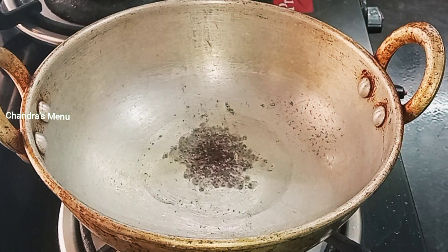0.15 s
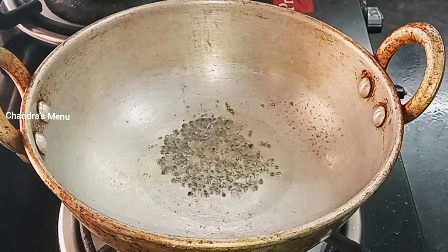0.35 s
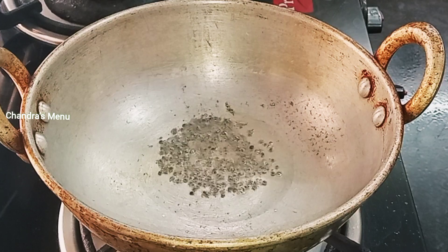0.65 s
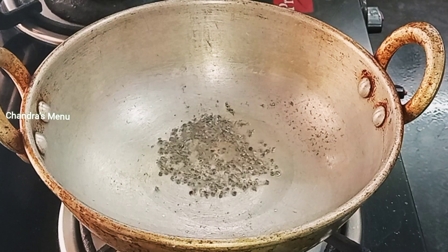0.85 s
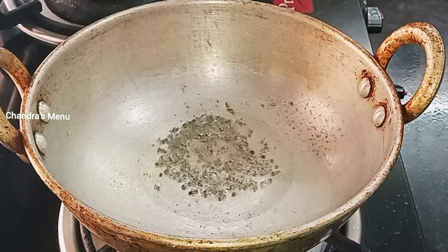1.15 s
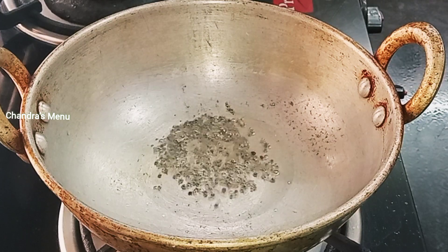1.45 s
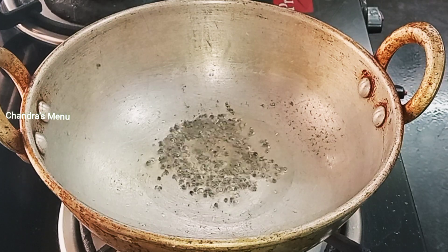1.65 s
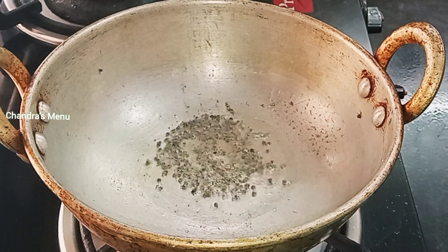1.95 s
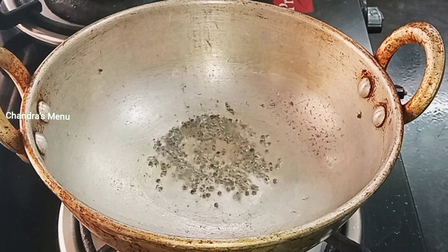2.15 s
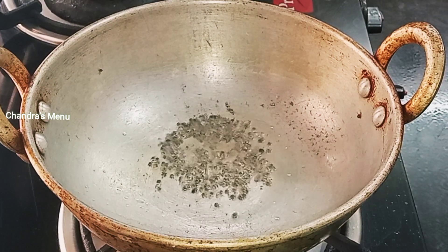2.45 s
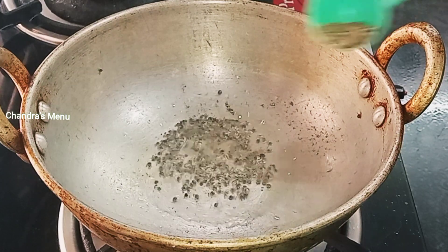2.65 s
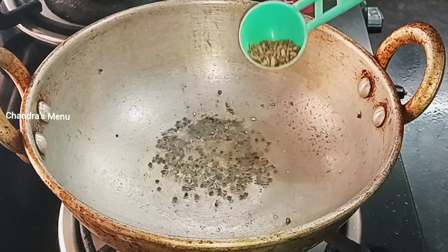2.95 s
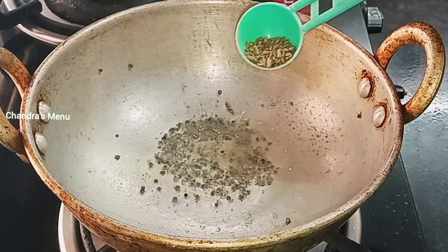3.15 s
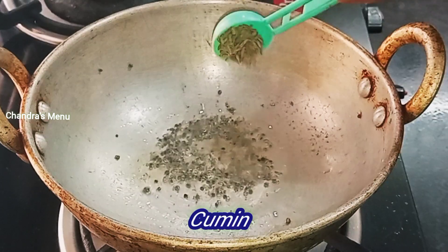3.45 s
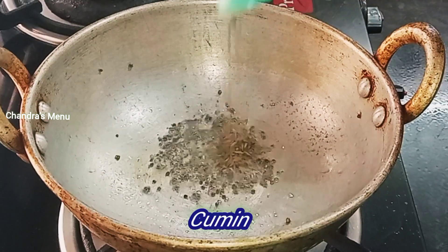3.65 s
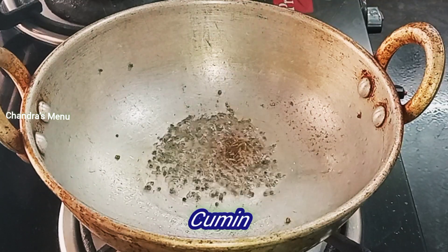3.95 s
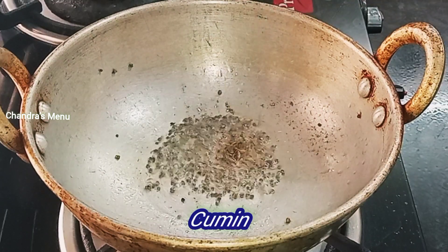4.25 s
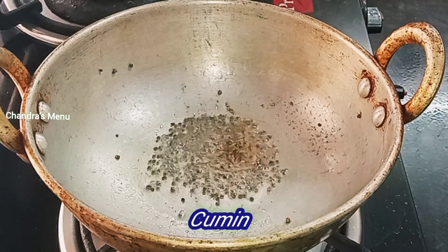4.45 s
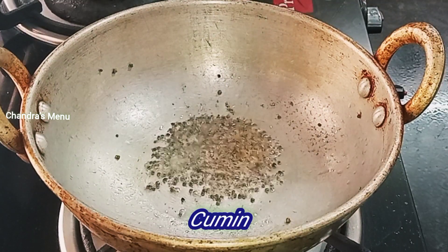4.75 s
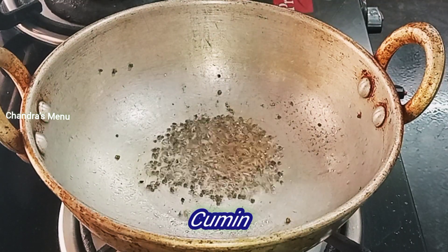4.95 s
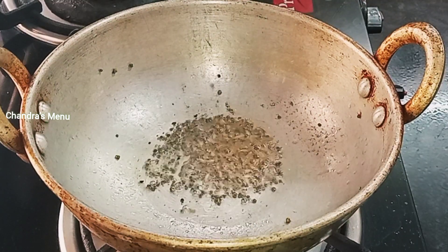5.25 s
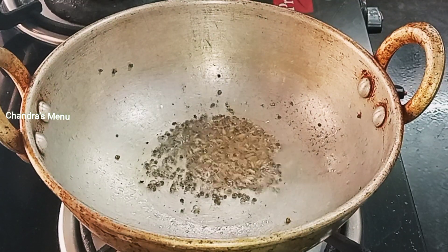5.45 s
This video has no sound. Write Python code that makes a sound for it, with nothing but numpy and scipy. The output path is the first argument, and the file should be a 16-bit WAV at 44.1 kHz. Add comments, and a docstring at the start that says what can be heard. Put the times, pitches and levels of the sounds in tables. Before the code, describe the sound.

Seeds temper in hot oil: one soft utensil knock, a few weak ticks, then louder crisp bursts that crowd together until the end without a pause. Each has a brief hissing tail and slight metallic pan ring. A fine oil fizz rises late. Close microphone, short hard-walled room echo, mono, occasional blunt drop hits and faint bumps.

```python
"""Mustard and cumin seeds burst in hot oil in a steel pan, heard from close above in a small kitchen.
First a utensil is set down: noise through its resonances, with duller knocks like it throughout.
Single bursts follow and soon crowd together: noise cracks with hissing tails from steam, pan and walls.
Flying drops thump the microphone as short pushes. A fizz of tiny clicks lies between and grows near the end;
below, a low hum of narrow noise wavers and mostly sinks away."""
import sys
import numpy as np
from scipy import signal
from scipy.fft import rfft, irfft
from scipy.io import wavfile
from scipy.ndimage import uniform_filter1d

SR = 44100
rng = np.random.default_rng(int(sys.argv[2]) if len(sys.argv) > 2 else 0)


def to_wav(sig):
    """Store sig (one row per channel, or 1-D mono) as 16-bit WAV at the path in sys.argv[1].

    Samples outside -1..1 are clipped; the rate is SR.
    """
    pcm = np.clip(np.atleast_2d(sig), -1, 1) * 32767
    pcm = np.round(pcm).astype(np.int16)
    wavfile.write(sys.argv[1], SR, pcm.T)  # frames by channels


def linear_from_db(decibels):
    """Turn decibels (scalar or array-like) into linear amplitude factors; 0 gives 1."""
    return 10 ** (np.asarray(decibels, float) / 20)


N = 246519   # length in samples


def rms_one(x):
    """Scales a sound to an average strength (rms) of 1."""
    return x / np.sqrt(np.mean(x ** 2) + 1e-20)


def colour(x, spectrum, size=4096):
    """Filters by a spectrum without sounding early: the folded cepstrum makes it minimum phase."""
    hz, db = np.transpose(spectrum)
    grid = np.maximum(np.arange(size // 2 + 1) * SR / size, 1)
    curve_db = np.interp(np.log(grid), np.log(hz), db)
    cepstrum = irfft(np.log(linear_from_db(curve_db)))
    cepstrum[1:size // 2] *= 2
    cepstrum[size // 2 + 1:] = 0
    response = irfft(np.exp(rfft(cepstrum)))
    return signal.fftconvolve(x, response)[:len(x)]


def resonance(x, hz, width_hz):
    """One ringing pitch: a pair of poles with gain 1 at its top; a narrower width rings longer."""
    r = np.exp(-np.pi * width_hz / SR)
    poles = [1, -2 * r * np.cos(2 * np.pi * hz / SR), r * r]
    return signal.lfilter(np.array([1, 0, -1]) * (1 - r * r) / 2, poles, x)


def dying(t60_s, size):
    """A fading curve that falls 60 dB in t60_s."""
    return linear_from_db(-60 * np.arange(size) / (t60_s * SR))


def drift(rate_hz):
    """Slow random wandering of spread 1: noise smoothed twice."""
    r = np.exp(-2 * np.pi * rate_hz / SR)
    wander = signal.lfilter([1], [1, -2 * r, r * r], rng.standard_normal(N + SR))
    return rms_one(wander[SR:])


def band_pass(x, low_hz, high_hz, order=2):
    """Keeps the range between two pitches."""
    return signal.sosfilt(signal.butter(order, [low_hz, high_hz], "band", fs=SR, output="sos"), x)


def kitchen(x):
    """Dense wall echoes of unit energy: fading noise whose treble dies sooner."""
    size = SR // 2
    noise = rng.standard_normal((2, size))
    low = signal.sosfilt(signal.butter(2, 6000, fs=SR, output="sos"), noise[0]) * dying(0.4, size)
    high = signal.sosfilt(signal.butter(2, 6000, "high", fs=SR, output="sos"), noise[1]) * dying(0.25, size)
    fade_in = np.clip(np.arange(size) / (0.0045 * SR), 0, 1)
    echoes = (low + high) * fade_in
    return signal.fftconvolve(x, echoes / np.sqrt(np.sum(echoes ** 2)))[:N]


# the bursts with set times, strong and weak:
# start_s, crack_peak_db, centre_hz, tail_db (before each band takes its share)
TIMED_POPS = [(0.2934, -27.5, 3770, -49.5), (0.482, -35, 2040, -48.5), (0.507, -27, 7270, -57),
              (0.5701, -25, 7400, -42), (0.7276, -19.5, 7930, -51), (0.927, -19, 8040, -38),
              (1.075, -16, 8200, -46.5), (1.1657, -15, 4030, -46), (1.278, -30.5, 5000, -50),
              (1.4292, -15.5, 8600, -45.5), (1.4655, -21, 6270, -52), (1.4944, -17.5, 8900, -48),
              (1.5542, -30, 7040, -44), (1.591, -19.5, 5350, -39.5), (1.6514, -19.5, 6540, -46),
              (1.6708, -23.5, 8900, -44), (1.8316, -18.5, 7250, -41), (1.881, -16, 5800, -40),
              (1.9716, -16.5, 6460, -37.5), (2.11, -18, 7450, -40.5), (2.174, -15.5, 8400, -53),
              (2.1938, -21, 7000, -39), (2.288, -13.5, 7150, -45.5), (2.3246, -18.5, 5940, -40.5),
              (2.3547, -24.5, 6800, -44.5), (2.4263, -13.5, 7150, -49), (2.457, -18, 3520, -46),
              (2.5185, -22, 7850, -59), (2.5329, -19, 7140, -55), (2.5682, -10.5, 8940, -37.5),
              (2.598, -19.5, 5600, -34.5), (2.631, -13, 6640, -53), (2.6575, -20.5, 4100, -42),
              (2.696, -24, 7400, -46.5), (2.7462, -19.5, 8800, -47.5), (2.7906, -19, 6500, -41),
              (2.9313, -17, 4200, -32.5), (3.0061, -15, 6800, -46), (3.0415, -18.5, 5950, -48.5),
              (3.0692, -22, 8300, -40.5), (3.1444, -19.5, 6140, -35.5), (3.2292, -19.5, 8700, -42),
              (3.249, -14.5, 3470, -37.5), (3.2761, -21, 5700, -42), (3.3143, -19.5, 6660, -42.5),
              (3.3819, -25, 4340, -64), (3.4175, -20.5, 6400, -38.5), (3.4426, -15.5, 5200, -39),
              (3.4981, -19, 6500, -42.5), (3.519, -16, 6560, -37), (3.5603, -23.5, 3940, -42.5),
              (3.6022, -31.5, 7040, -42), (3.6779, -21.5, 7100, -38), (3.6936, -20, 9400, -45),
              (3.7448, -15, 4870, -39), (3.7835, -15, 4260, -34.5), (3.7996, -14.5, 3970, -30),
              (3.8492, -20.5, 4050, -53), (3.9064, -16.5, 4240, -40), (3.966, -18.5, 7200, -38.5),
              (4.0068, -17, 6270, -45.5), (4.0171, -16, 8000, -59.5), (4.0901, -17.5, 5800, -55.5),
              (4.1017, -17, 7500, -33), (4.1406, -11.5, 6100, -45), (4.1656, -15.5, 5850, -66),
              (4.2357, -22.5, 8100, -41), (4.2932, -18.5, 3820, -37), (4.352, -16.5, 7900, -43.5),
              (4.3724, -19, 6370, -43.5), (4.464, -21, 3670, -55), (4.5545, -13.5, 3800, -58),
              (4.5788, -24, 7500, -36), (4.6292, -17, 6760, -53), (4.6488, -19, 7450, -59.5),
              (4.6948, -23, 8700, -42.5), (4.7726, -15, 5630, -46), (4.7955, -17, 7200, -61),
              (4.808, -19, 3900, -33), (4.838, -13, 6500, -56.5), (4.937, -19.5, 6160, -61),
              (4.956, -16, 8000, -41.5), (5.028, -17, 6400, -44.5), (5.1172, -16.5, 7560, -65),
              (5.1671, -17, 7800, -54), (5.1757, -20.5, 3260, -36.5), (5.245, -12, 6900, -38),
              (5.3725, -19, 4430, -40), (5.4435, -23.5, 2440, -68), (5.4479, -14.5, 2500, -52.5),
              (5.489, -11.5, 8200, -36), (5.515, -28, 7000, -31.5)]
# colour of pan and microphone: pitch_hz, level_db
CRACKLE_COLOUR = [(240, -64), (400, -17.5), (786, -9), (1040, 2), (1300, -4), (1950, 1), (2270, -5),
                  (3540, -3), (4130, -6.5), (5790, -3.5), (8110, -9.5), (9750, -1.5), (13500, -13.5),
                  (14800, -1.5), (15700, -7.5)]
# hiss of the tails: low_hz, high_hz, t60_s, steam_jet_share (of power)
TAIL_BANDS = [(470, 2470, 0.31, 0.081), (2800, 11200, 0.14, 0.18), (6430, 21400, 0.04, 0.22)]
# ringing pitches of the steel pan: pitch_hz, width_hz, level_db
PAN_MODES = [(703, 7.3, 18), (2817, 19, 7)]
JET_S = 0.067   # how long the steam jet holds


def pops(size=768):
    """A husk splits: a sharp crack round its own centre, then a hissing tail of steam and echoes."""
    near = np.zeros(N + size)
    tail_power = np.zeros((len(TAIL_BANDS), N))
    centres_hz = np.array([np.sqrt(band[0] * band[1]) for band in TAIL_BANDS])
    bursts = [*TIMED_POPS, *small_pops()]
    noises = rng.standard_normal((2 * len(TIMED_POPS), size))
    for (start_s, peak_db, hz, tail_db), noise in zip(bursts, noises):
        burst = 0.4 * noise * dying(49.1 / hz, size)   # larger husks ring longer
        burst[0] += np.sign(noise[0])   # the first snap
        ring = resonance(burst, hz, 0.42 * hz * np.sqrt(hz / 6000))
        edge = np.diff(burst, prepend=0)
        crack = colour(ring + 0.32 * burst + 0.09 * edge, CRACKLE_COLOUR, size=1024)
        at = round(start_s * SR)
        near[at:at + size] += crack * linear_from_db(peak_db) / np.abs(crack).max()
        # small husks hiss higher; each has its own tint
        octaves_off = np.log2(centres_hz / hz)
        tint = linear_from_db(5.2 * noise[-len(TAIL_BANDS):])
        tail_power[:, at] += linear_from_db(2 * tail_db) * np.exp(-(octaves_off / 1.184) ** 2) * tint
    out = near[:N] + linear_from_db(-9.0) * kitchen(near[:N])
    out += sum(linear_from_db(db) * resonance(out, hz, width_hz) for hz, width_hz, db in PAN_MODES)
    return out + tails(tail_power)


def tails(tail_power):
    """Hiss in bands: each burst swells it at once, then it dies while the steam jet holds and stops."""
    out = np.zeros(N)
    size = SR // 2
    t = np.arange(size) / SR
    for power, (low_hz, high_hz, t60_s, jet_share) in zip(tail_power, TAIL_BANDS):
        hiss = rms_one(colour(rng.standard_normal(N), CRACKLE_COLOUR))
        jet = jet_share * np.exp(-(t / JET_S) ** 2)
        shape = dying(t60_s / 2, size) + jet   # of power, so half the t60
        onset = 1 - dying(0.0015, size)
        swell = np.maximum(signal.fftconvolve(power, shape * onset)[:N], 0)
        flicker = linear_from_db(2.5 + 2.0 * drift(52))
        out += band_pass(hiss, low_hz, high_hz) * np.sqrt(swell) * flicker
    return out


# a timed burst jolts its neighbours: chance of setting one off, wait, and the tail it needs to do so
JOLT_SHARE, JOLT_MEAN_WAIT_S, JOLT_TAIL_DB = 0.75, 0.023, -47
# the jolted bursts: middle level and pitch, each spread evenly to both sides; tail under their peak
SMALL_DB, SMALL_SPREAD_DB, SMALL_HZ, SMALL_OCTAVES, SMALL_TAIL_DB = -24.5, 5.5, 5800, 0.48, -27.5


def small_pops():
    """Mostly weaker bursts follow the timed ones at random; rows like those of TIMED_POPS."""
    timed_s, timed_db, _, timed_tail_db = np.array(TIMED_POPS).T
    chance, wait, size, pitch = rng.random((len(TIMED_POPS), 4)).T
    start_s = timed_s + 0.004 - JOLT_MEAN_WAIT_S * np.log(1 - wait)
    # a stronger burst sets off stronger neighbours
    peak_db = SMALL_DB + SMALL_SPREAD_DB * (2 * size - 1) + 0.5 * (timed_db - timed_db.mean())
    centre_hz = SMALL_HZ * 2 ** (SMALL_OCTAVES * (2 * pitch - 1))
    rows = np.transpose([start_s, peak_db, centre_hz, peak_db + SMALL_TAIL_DB])
    return rows[(chance < JOLT_SHARE) & (timed_tail_db > JOLT_TAIL_DB) & (start_s < N / SR - 0.01)]


# drops that hit the microphone: start_s, push_db (before the bass cut), direction, push_length_ms
DROPS = [(0.5698, -4.5, -1, 0.82), (1.555, -10, -1, 0.97), (1.651, -11.5, 1, 0.092), (1.88, -16.5, 1, 0.33),
         (2.57, -8, 1, 0.088), (2.696, -5, 1, 0.057), (4.164, -12, 1, 0.077), (4.578, -2.5, 1, 0.09),
         (5.488, -17.5, 1, 1.7)]


def thumps():
    """A drop pushes the diaphragm at once and lets go; the bass cut makes it swing back."""
    out = np.zeros(N)
    for start_s, push_db, direction, length_ms in DROPS:
        t = np.maximum(np.arange(N) / SR - start_s, 0)
        push = (1 - np.exp(-t / 0.00008)) * np.exp(-t * 1000 / length_ms)
        out += np.sign(direction) * linear_from_db(push_db) * push
    return signal.sosfilt(signal.cheby1(2, 2.5, 88, "high", fs=SR, output="sos"), out)


# dull knocks and bumps further off: start_s, peak_db (before echoes), pitch_hz, width_hz
DULL_KNOCKS = [(0.151, -44, 252, 80), (0.352, -49.5, 262, 155), (2.173, -53, 300, 211),
               (3.002, -55.5, 200, 100), (3.332, -59, 189, 58.5), (4.191, -46.5, 290, 160),
               (4.782, -45.5, 238, 200), (4.808, -41.5, 721, 72.5), (5.172, -48.5, 246, 150),
               (5.172, -34.5, 1151, 56)]
# ringing pitches of a utensil set down: pitch_hz, width_hz, level_db
UTENSIL_MODES = [(1016, 260, -12.5), (1507, 204, 4), (2395, 430, -2.5), (2950, 620, -19), (4020, 370, -19),
                 (5000, 390, -15), (6400, 200, -15)]
CLANK_S, CLANK_DB = 0.118, -7.5   # when the utensil is set down, and its gain


def knocks(size=SR // 4):
    """Short rattles of noise through broad resonances; the kitchen carries them on."""
    out = np.zeros(N + size)
    rattle = rng.standard_normal(size) * dying(0.043, size)
    clank = 0.16 * band_pass(rattle, 600, 7000, order=3)
    for hz, width_hz, level_db in UTENSIL_MODES:
        clank += linear_from_db(level_db) * resonance(resonance(rattle, hz, width_hz), hz, 2 * width_hz)
    at = round(CLANK_S * SR)
    out[at:at + size] += linear_from_db(CLANK_DB) * clank
    noises = rng.standard_normal((len(DULL_KNOCKS), size))
    for (start_s, peak_db, hz, width_hz), noise in zip(DULL_KNOCKS, noises):
        body = resonance(resonance(noise * dying(0.081, size), hz, width_hz), hz, 2 * width_hz)
        at = round(start_s * SR)
        out[at:at + size] += linear_from_db(peak_db) * body / np.abs(body).max()
    return out[:N] + linear_from_db(3.0) * kitchen(out[:N])


# colour of the fizz: pitch_hz, level_db
FIZZ_COLOUR = [(240, -82), (400, -21.5), (1020, -9), (1300, -9.5), (1750, -8), (2450, -11.5), (3380, -14),
               (6440, -6), (7990, -15.5), (9610, -6.5), (12900, -23.5), (14800, -16), (15700, 0)]


def fizz(level_db):
    """Tiny steam bubbles: dense clicks of uneven size in clumps, blurred by the kitchen into hiss."""
    sizes = linear_from_db(5 * np.minimum(rng.exponential(1, N), 5)) * rng.standard_normal(N)
    clicks_per_s = 1500 * linear_from_db(3.0 * drift(15))
    clicks = rms_one(sizes * (rng.random(N) < clicks_per_s / SR))
    return linear_from_db(level_db) * rms_one(colour(0.5 * clicks + kitchen(clicks), FIZZ_COLOUR))


# colour of the rumble: pitch_hz, level_db
RUMBLE_COLOUR = [(15, -79), (25, -16), (49, -18), (141, 1.5), (161, -6), (325, -24), (442, -35.5),
                 (600, -16), (780, -27), (1320, -120)]
RUMBLE_DB = -66.5   # its middle level
HUM_HZ, HUM_WIDTH_HZ = 134.1, 9.8


def hum(level_db):
    """Narrow noise that wavers round one low pitch, over a faint rumble that swells and sinks with it."""
    tone = resonance(rng.standard_normal(N), HUM_HZ, HUM_WIDTH_HZ)
    tone = resonance(tone, HUM_HZ, 3.4 * HUM_WIDTH_HZ)
    rumble = rms_one(colour(rng.standard_normal(N), RUMBLE_COLOUR, size=16384))
    rumble_db = RUMBLE_DB + 0.46 * (level_db - level_db.mean()) + 2.0 * drift(4.9)
    return linear_from_db(level_db) * rms_one(tone) + linear_from_db(rumble_db) * rumble


# how loud the background is, joined by straight lines: time_s, fizz_db, hum_db
BACKGROUND = [(0.0, -58, -56.5), (0.39, -50, -59.5), (0.95, -52.5, -54), (1.1, -56, -60),
              (1.26, -50.5, -61.5), (2.07, -54.5, -65), (2.65, -52.5, -69), (2.82, -56, -74.5),
              (3.44, -61, -74.5), (3.87, -69.5, -65), (4.25, -43.5, -78.5), (4.42, -48.5, -74),
              (4.86, -49, -75), (5.28, -45, -66), (5.59, -48, -75)]


def scene():
    """Adds all the sources into one channel."""
    time_s, *columns = np.transpose(BACKGROUND)
    fizz_db, hum_db = (np.interp(np.arange(N) / SR, time_s, column) for column in columns)
    return (pops() + thumps() + knocks() + fizz(fizz_db) + hum(hum_db))[None]


# noise suppressor: its band, threshold, deepest cut and smoothing time
SUPPRESS_LOW_HZ, SUPPRESS_HIGH_HZ = 800, 2640
SUPPRESS_AT_DB, SUPPRESS_CUT_DB, SUPPRESS_S = -65, -10, 0.025


def suppress(x):
    """The recorder turns the middle band down whenever that band sinks towards its threshold."""
    edges_hz = [SUPPRESS_LOW_HZ, SUPPRESS_HIGH_HZ]
    band = signal.sosfiltfilt(signal.butter(2, edges_hz, "band", fs=SR, output="sos"), x)
    power = uniform_filter1d(band ** 2, int(SUPPRESS_S * SR)) + 1e-14
    gain = np.maximum(power / (power + linear_from_db(2 * SUPPRESS_AT_DB)), linear_from_db(SUPPRESS_CUT_DB))
    return x - (1 - gain) * band


def band_limit(x):
    """A steep low-pass at the top of the band."""
    return signal.sosfilt(signal.butter(12, 16800, fs=SR, output="sos"), x)


def record(dry):
    """Quiet middles are suppressed, then everything from 15900 Hz up is cut by 36 dB or more."""
    top_cut = signal.cheby2(12, 36, 15900, fs=SR, output="sos")
    mix = signal.sosfilt(top_cut, suppress(dry))
    return band_limit(mix)


dry = scene()
out = record(dry)
to_wav(out)
```